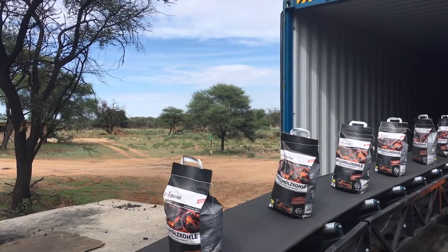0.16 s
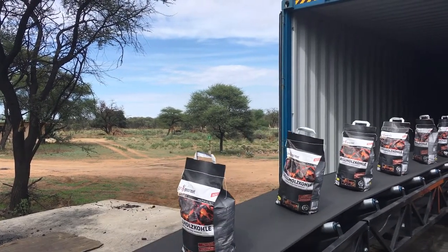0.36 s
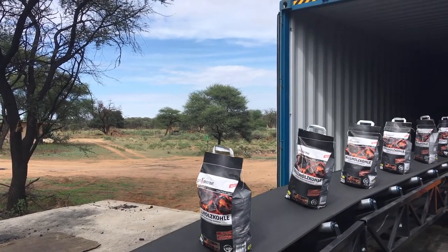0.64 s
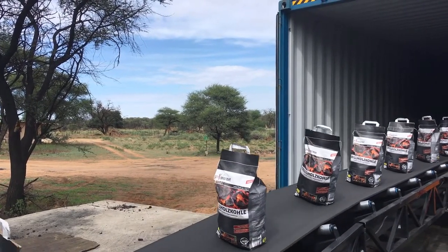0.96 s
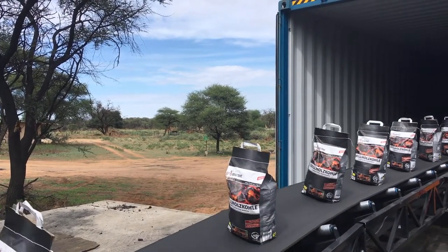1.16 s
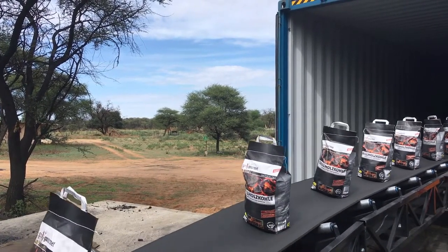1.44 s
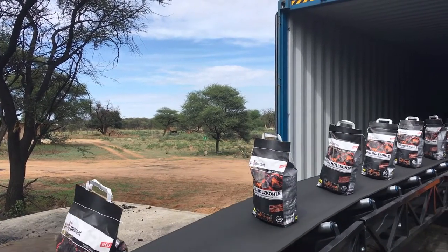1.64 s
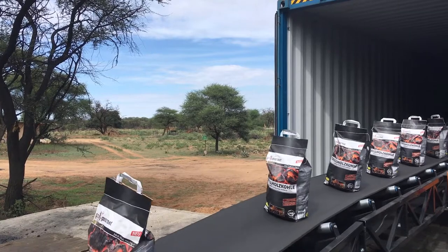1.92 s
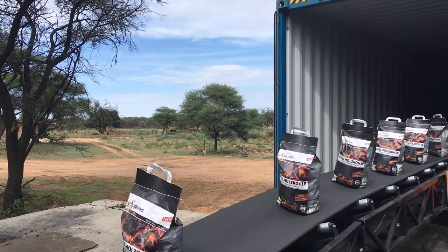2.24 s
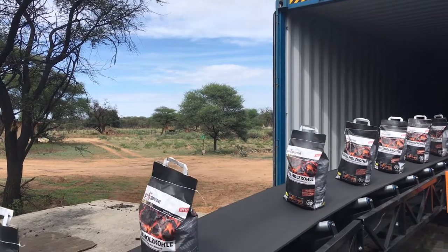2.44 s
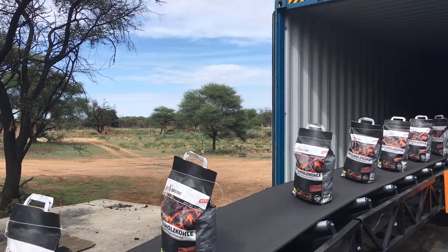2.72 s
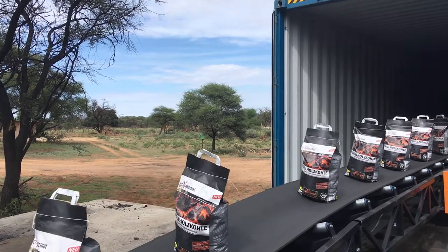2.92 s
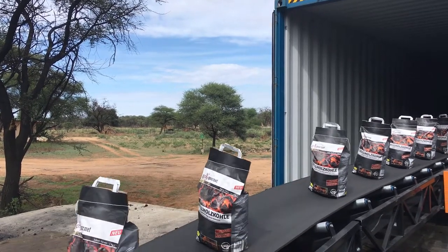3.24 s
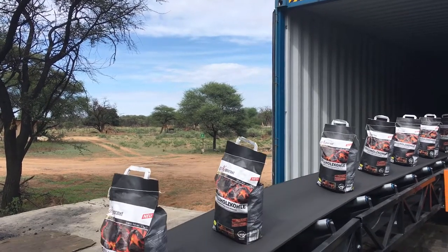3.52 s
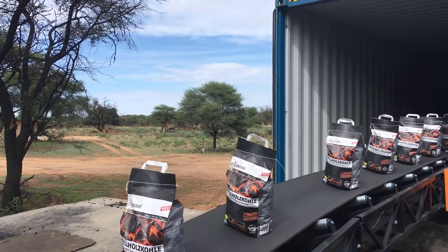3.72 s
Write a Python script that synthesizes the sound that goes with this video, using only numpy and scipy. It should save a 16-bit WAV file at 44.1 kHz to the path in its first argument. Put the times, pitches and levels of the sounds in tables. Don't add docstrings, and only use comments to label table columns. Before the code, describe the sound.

A belt conveyor hums low and steady, with rumbling frame and hissing, faintly ringing rollers throughout. From 0.3 to 1.2 seconds paper sacks of lumps scrape, crackle and knock dully. It calms around 1.3-1.8, then short rustles and knocks come near 2.0, 2.3, 2.8 and 3.1. From 3.3 scraping swells with rapid knocks, ending in a heavy thud at 3.8. Dry, close, outdoors.

```python
import sys
import numpy as np
from scipy import signal
from scipy.io import wavfile
from scipy.ndimage import uniform_filter1d

SR = 44100
rng = np.random.default_rng(int(sys.argv[2]) if len(sys.argv) > 2 else 0)


def materialize(psi):
    bounded = np.clip(np.atleast_2d(psi).T, -1, 1)
    quanta = np.round(bounded * 32767).astype(np.int16)
    wavfile.write(sys.argv[1], SR, quanta)


def rack_gain(trim_db):
    fader = np.asarray(trim_db, float)
    return 10 ** (fader / 20)


N = 170667


def rms_one(x):
    return x / np.sqrt(np.mean(x ** 2) + 1e-20)


def drift(rate_hz):
    r = np.exp(-80 * np.pi * rate_hz / SR)
    noise = rng.standard_normal(N // 40 + 2002)
    slow = signal.lfilter([1], [1, -2 * r, r * r], noise)[2000:]
    return np.interp(np.arange(N) / 40, np.arange(len(slow)), rms_one(slow))


def butter(x, hz, kind="low"):
    return signal.sosfilt(signal.butter(2, hz, kind, fs=SR, output="sos"), x)


def bands(source, spectrum, patchy_db, rate_hz):
    hz, db = np.transpose(spectrum)
    octaves = np.log2(min(hz[-1], 17000) / hz[0])
    edges = hz[0] * 2 ** np.arange(0, octaves + 1 / 3, 1 / 3)
    out = 0
    for k, (low, high) in enumerate(zip(edges, edges[1:])):
        middle = np.sqrt(low * high)
        band = butter(source[k % 2], [low, high], "band")
        level_db = np.interp(np.log(middle), np.log(hz), db)
        out = out + band * rack_gain(level_db + patchy_db * drift(rate_hz))
    return out / np.sqrt(np.median(uniform_filter1d(out ** 2, size=4410)))


def peak(x, hz, width_hz):
    r = np.exp(-np.pi * width_hz / SR)
    edge = (1 - r * r) / 2
    return signal.lfilter([edge, 0, -edge], [1, -2 * r * np.cos(2 * np.pi * hz / SR), r * r], x)


def grains():
    grains_per_s, spread_db = 6000, 1.5
    size_db = spread_db * np.minimum(rng.exponential(1, (2, N)), 5)
    sizes = rack_gain(size_db) * rng.choice([-1, 1], (2, N))
    return sizes * (rng.random((2, N)) < grains_per_s / SR)


def motor():
    # multiple of the mains rate, level/dB, wander/dB
    partials = [(1, -53, -0.5), (2, -35.5, 1.07), (3, -59, 3), (4, -48.5, 0.9), (6, -56, 0.2),
                (8, -94, 5.5)]
    mains_hz, crest_s = 50.07, .003
    turn = 2 * np.pi * mains_hz * (np.arange(N) / SR - crest_s)
    hum = 0
    for k, db, wander_db in partials:
        hum = hum + np.sqrt(2) * rack_gain(db + wander_db * drift(2.8)) * np.cos(k * turn)
    return hum, np.cos(2 * turn)


def belt(buzz):
    # f/Hz, level/dB
    rollers = [(190, -23), (330, -7), (358, -7), (662, -1), (914, -3.5), (1130, -2), (2120, -3.5),
               (2700, -8.5), (15800, -28)]
    # f/Hz, width/Hz, level/dB
    shells = [(1563, 95, -15.5), (2005, 90, -15), (2085, 79, -9), (2320, 140, -16.5), (3157, 110, -13.5),
              (5770, 40, -26)]
    # f/Hz, level/dB
    rumble_colour = [(25, -32), (38, -7), (50, 1), (70, 2), (130, -6.5), (250, -8), (350, -12),
                     (600, -25.5)]
    rollers_db, rumble_db = -44.5, -42
    turns_per_s, loudest_s, swing_db, flutter_db = 8.12, 2.385, 3.2, 1.8
    buzz_depth, buzz_top_hz = 0.2, 3000

    rush = bands(rng.standard_normal((2, N)), rollers, patchy_db=1.2, rate_hz=3.0)
    turn = np.cos(2 * np.pi * turns_per_s * (np.arange(N) / SR - loudest_s))
    for hz, width_hz, db in shells:
        ring = rms_one(peak(rng.standard_normal(N), hz, width_hz))
        rush = rush + rack_gain(db + swing_db * turn + flutter_db * drift(7.1)) * ring
    pulsed = butter(buzz * rush, buzz_top_hz)
    rumble = bands(rng.standard_normal((2, N)), rumble_colour, patchy_db=1.7, rate_hz=12.0)
    return rack_gain(rollers_db) * (rush + buzz_depth * pulsed) + rack_gain(rumble_db) * rumble


def sacks():
    # t/s, peak level/dB, rise/s, lumps against paper/dB, 60 dB decay/s
    shakes = [(0.309,-30.5,0.037,3.5,0.28), (0.418,-32,0.0078,-3,0.72), (0.655,-34.5,0.057,2,0.93),
              (0.779,-32.5,0.021,3.5,0.45), (0.869,-32,0.0074,-4.5,0.16), (1.059,-40,0.012,2,0.33),
              (1.13,-28,0.01,-2.5,0.36), (1.189,-34,0.011,-1,0.22), (1.669,-40.5,0.006,-19,0.4),
              (1.775,-42.5,0.013,-9,0.4), (1.909,-40,0.016,4.5,0.79), (1.9655,-32.5,0.008,-1,0.39),
              (1.989,-31,0.027,-2,0.37), (2.245,-39,0.04,-16,0.62), (2.282,-32,0.05,2,0.43),
              (2.756,-29,0.025,-0.5,0.25), (3.031,-37.5,0.0059,-23,0.22), (3.117,-29.5,0.012,0,0.35),
              (3.36,-35,0.042,6.5,0.78), (3.435,-32,0.014,2,0.2), (3.7,-34.5,0.014,5,0.7),
              (3.799,-30,0.0088,3.5,0.32)]
    # t/s, peak level/dB, rise/s, lumps against paper/dB, 60
    # dB decay/s
    more_shakes = [
        (0.001, -45, .004, -15, 3.5),
        (0.662, -36.5, 0.016, 11.5, 0.1),
        (1.475, -39, 0.077, 0, 1.34),
        (2.13, -51, 0.068, -9.5, 2.4),
        (2.5855, -42, 0.022, -16, 1.7),
    ]
    # f/Hz, level/dB
    crackle = [(2500, -0.5), (4000, 1.5), (6000, 3), (8000, -1), (12000, -2.5), (16000, -10)]
    # f/Hz, level/dB
    body = [(250, -13), (500, 5), (1000, 2.5), (2000, 5), (3000, -21.5), (4500, -21.5)]
    trim_db = -8.5
    snap_db, snap_t60_s, snap_hz = -5, .06, 8000

    t = np.arange(N) / SR
    paper_power, lump_power, snap_power = np.zeros(N), np.zeros(N), np.zeros(N)
    for start_s, db, rise_s, body_db, t60_s in shakes + more_shakes:
        age = np.maximum(t - start_s + rise_s / 2, 0)
        fading = np.maximum(age - rise_s, 0)
        swell = np.minimum(age / rise_s, 1)
        power = (rack_gain(db + trim_db - 60 * fading / t60_s) * swell) ** 2
        paper_power += power
        lump_power += power * rack_gain(body_db) ** 2
        snap_power += power * rack_gain(snap_db - 60 * fading / snap_t60_s) ** 2
    clicks = grains()
    snap = np.sqrt(snap_power) * rms_one(butter(grains()[0], snap_hz, "high"))
    paper = np.sqrt(paper_power) * bands(clicks, crackle, patchy_db=1.6, rate_hz=8.8)
    lumps = np.sqrt(lump_power) * bands(clicks, body, patchy_db=1.5, rate_hz=9.6)
    return snap + paper + lumps


def drag():
    # t/s, level/dB
    load = [(0, -70), (.28, -47.5), (.38, -43), (.5, -39.5), (.6, -36), (.72, -44), (.92, -41.5),
            (1.25, -55), (1.45, -67.5), (2.2, -55.5), (2.6, -50.5), (3.2, -51), (3.33, -44.5),
            (3.42, -41.5), (3.55, -36), (3.72, -38.5), (3.87, -43)]
    # f/Hz, level/dB
    scrape_colour = [(150, 6), (280, 4), (500, -7), (900, -2), (2200, -5), (3800, -7.5), (6000, -14),
                     (16000, -36)]
    sing_hz, hz_per_db, sing_width_hz, sing_db = 2254, 35.5, 133, -8.5
    flutter_db = .8

    s, db = np.transpose(load)
    load_db = np.interp(np.arange(N) / SR, s, db)
    pitch_hz = sing_hz + hz_per_db * (load_db - max(db)) + 60 * drift(6.5)
    turn = 2 * np.pi * np.cumsum(pitch_hz) / SR
    slow = butter(rng.standard_normal((2, N)), sing_width_hz)
    sing = rms_one(slow[0] * np.cos(turn) + slow[1] * np.sin(turn))
    scrape = bands(grains(), scrape_colour, patchy_db=0.15, rate_hz=11.0)
    return rack_gain(load_db + flutter_db * drift(25.5)) * (scrape + rack_gain(sing_db) * sing)


def blows(rows, upper, upper_db):
    out, t = np.zeros(N + SR), np.arange(SR // 2) / SR
    for start_s, db, hz, t60_s in rows:
        turn = 2 * np.pi * hz * t
        ring = np.sin(turn) + rack_gain(upper_db) * np.sin(upper * turn)
        first = int(start_s * SR)
        out[first:first + len(t)] -= rack_gain(db - 60 * t / t60_s) * ring
    return out[:N]


def frame():
    # t/s, peak level/dB, f/Hz, 60 dB decay/s
    knock_rows = [(0.546,-34.5,204,0.14), (0.664,-33.5,217,0.2), (0.684,-30.5,428,0.083),
                  (0.78,-34,352,0.071), (1.133,-28,266,.06), (1.514,-32.5,198,0.13),
                  (1.9958,-26.5,232,0.043), (2.292,-27,196,0.097), (2.762,-24,201,0.05),
                  (3.292,-34,253.5,.1), (3.379,-33,466,0.082), (3.438,-23.5,210,0.037),
                  (3.543,-24.5,275,0.11), (3.622,-28.5,283,0.16), (3.658,-29,245,0.18),
                  (3.699,-30.5,252,0.084), (3.735,-29.5,209,0.07), (3.8012,-23,250,0.053),
                  (3.806,-26.5,192,0.06)]
    # t/s, peak level/dB, f/Hz, 60 dB decay/s
    thud_rows = [
        (0.774,-33.5,79,0.25),
        (1.175,-34,68.5,0.097),
        (2.29,-36,59.3,0.17),
        (3.089,-41,76.5,0.22),
        (3.84,-25,58,0.067),
    ]
    soft_hz = 614
    soft = np.exp(-2 * np.pi * soft_hz / SR)
    knocks = blows(knock_rows, upper=1.6, upper_db=-5.5)
    thuds = blows(thud_rows, upper=1.846, upper_db=-3.5)
    return signal.lfilter([1 - soft], [1, -soft], knocks + thuds)


def scene():
    hum, buzz = motor()
    return (hum + belt(buzz) + sacks() + drag() + frame())[None]


def top_cut(x):
    return signal.sosfilt(signal.butter(12, 15900, fs=SR, output="sos"), x)


def record(dry):
    # f/Hz, width/Hz, depth/0-1
    dips = [(4870, 790, .5), (7730, 1200, 0.54)]
    low_hz, top_hz = 34, 15740
    for hz, width_hz, depth in dips + [(10400, 600, .45)]:
        dry = dry - depth * peak(dry, hz, width_hz)
    dry = butter(dry, low_hz, "high")
    mix = signal.sosfilt(signal.ellip(10, .5, 60, top_hz - 60, fs=SR, output="sos"), dry)
    return top_cut(mix)


dry = scene()
out = record(dry)
materialize(out)
```